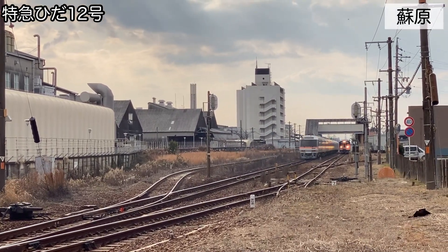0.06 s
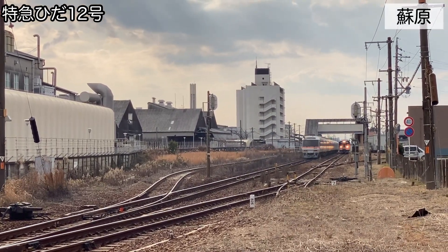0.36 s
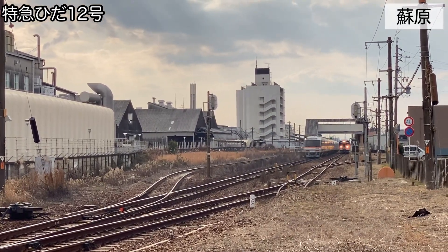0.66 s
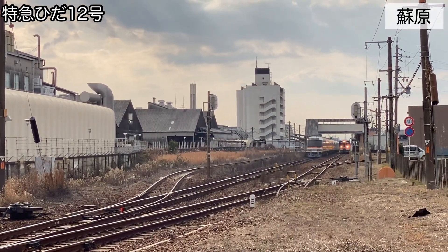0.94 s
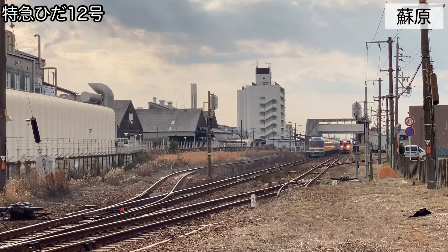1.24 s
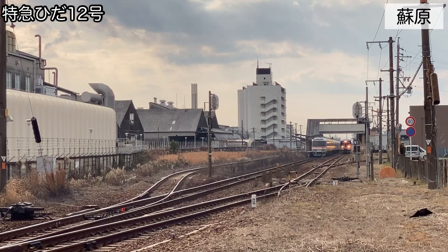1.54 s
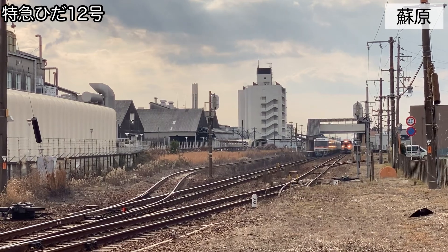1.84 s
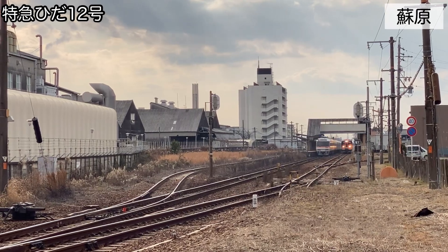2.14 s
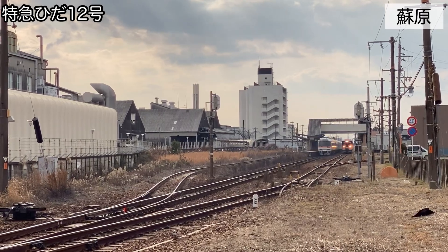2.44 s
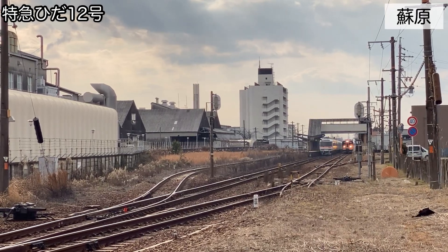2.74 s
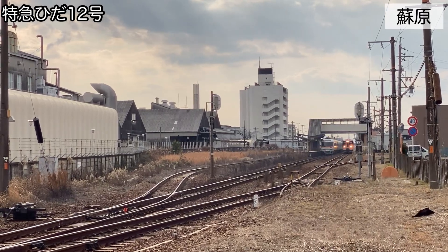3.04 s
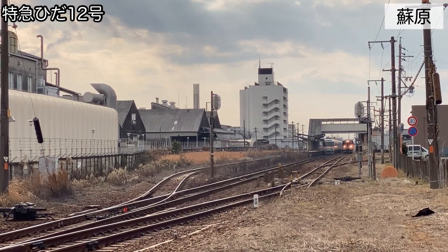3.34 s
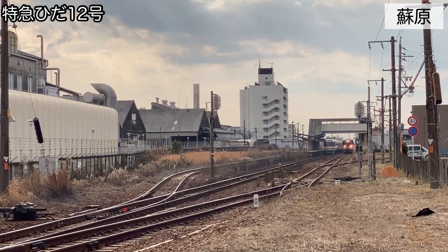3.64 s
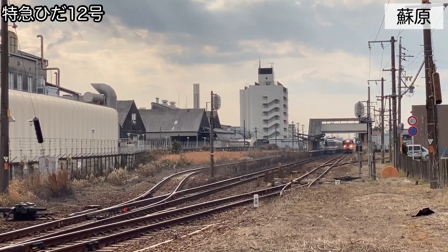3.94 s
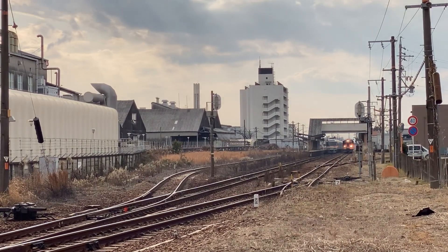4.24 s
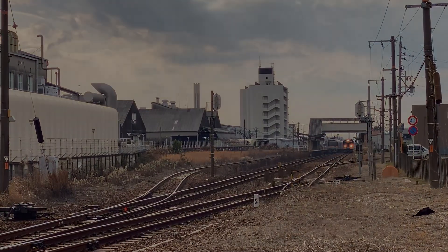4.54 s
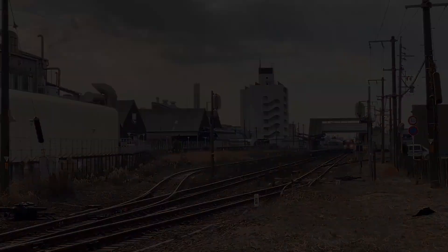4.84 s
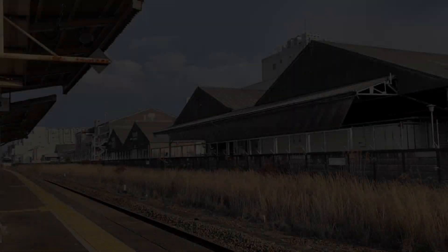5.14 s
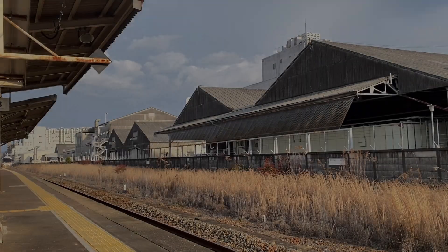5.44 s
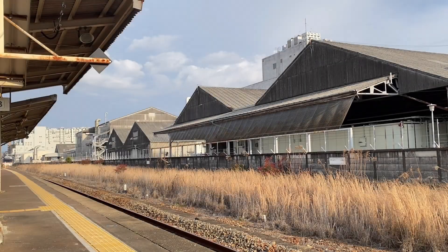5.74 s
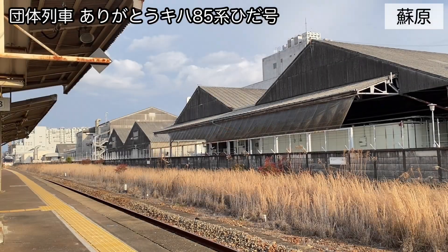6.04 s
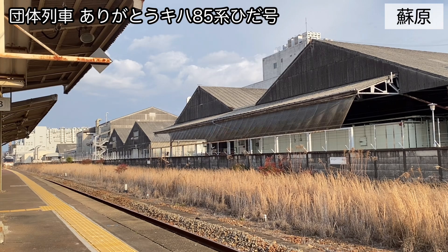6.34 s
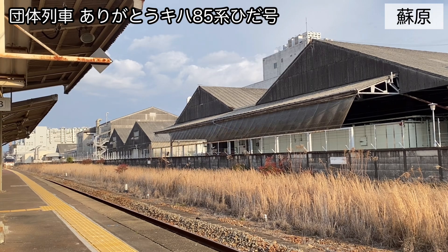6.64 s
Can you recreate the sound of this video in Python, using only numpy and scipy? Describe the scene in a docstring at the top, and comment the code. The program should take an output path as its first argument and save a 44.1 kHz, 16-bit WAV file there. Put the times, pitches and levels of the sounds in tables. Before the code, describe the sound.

From the start, a diesel train is heard drawing away at a distance from beside the track. Its wheels make a steady rolling roar with a wavering howl and a light hiss that eases over the first second or two. The low engine hum surges and fades unevenly, strongest around 2 seconds. Wind buffets the microphone, with low thumps from about 2.2 to 2.5 seconds and repeatedly from 3.5 to 5. Blurred clatter over rail joints comes between 3.2 and 4.4 seconds as the rumble builds. At 5 seconds the sound cuts abruptly to a much quieter platform, with town murmur, a faint electrical factory hum and softly rustling reeds. A strong gust thumps the microphone from 6.3 to 6.5 seconds, the loudest moment. A small dry click follows, then three faint, thin, sharp ticks before the end near 7 seconds.

```python
"""Beside the track at a station, a diesel railcar draws away: its exhaust hums at a 75 Hz firing rate
under the distant roar, howl and clatter of its wheels, while wind buffets and thumps the microphone.
At five seconds the scene cuts to a quiet platform beside a factory: town murmur, faint mains hum,
one strong gust, rustling reeds, a dry click and a few thin, sharp ticks."""
import sys
import numpy as np
from scipy import signal
from scipy.fft import rfft, irfft, next_fast_len
from scipy.io import wavfile
from scipy.ndimage import uniform_filter1d

SR = 44100
rng = np.random.default_rng(int(sys.argv[2]) if len(sys.argv) > 2 else 0)


def transcribe(signal):
    """Save signal, clipped to [-1, 1], as a 16-bit WAV file at the path in sys.argv[1]."""
    frames = np.atleast_2d(signal).T
    limited = np.clip(frames, -1, 1)
    pcm = np.round(limited * 32767).astype(np.int16)
    wavfile.write(sys.argv[1], SR, pcm)


N = 303842
TIME = np.arange(N) / SR
CUT_S = 5.0205   # hard cut from trackside to platform
TRACKSIDE = 1.0 * (TIME < CUT_S)
PLATFORM = 1 - TRACKSIDE

# The engine's note. Each row: multiple of the firing rate, relative level in dB.
ENGINE_ORDERS = [(1, -3.5), (1.5, -26), (2, -28), (2.667, -29.5), (3, -32.5)]
# The hum surges and fades through moving air. Each row: time in seconds, level in dB.
EXHAUST_FADER = [(0, -39), (.08, -40), (.17, -37.5), (.26, -41.5), (.4, -37.5), (.49, -54), (.57, -37.5),
                 (.68, -46.5), (.76, -36.5), (.85, -46.5), (.98, -35), (1.14, -34.5), (1.2, -57),
                 (1.27, -38), (1.33, -38), (1.41, -50.5), (1.55, -44), (1.7, -42), (1.83, -42.5),
                 (1.92, -30), (1.99, -33), (2.08, -28), (2.18, -41.5), (2.31, -26.5), (2.39, -43.5),
                 (2.6, -41), (2.72, -50), (2.79, -33.5), (2.9, -42), (3.0, -39), (3.09, -37.5),
                 (3.15, -43.5), (3.33, -30.5), (3.45, -43), (4.2, -48), (4.5, -42), (4.7, -47), (4.78, -31),
                 (4.87, -45), (4.95, -33.5), (5.02, -38)]


def exhaust(firing_hz=75.1, drone_hz=142, drone_width_hz=85):
    """Only the lowest engine orders carry this far; the upper ones waver and blur into a drone."""
    level_db, = in_time(EXHAUST_FADER)
    unsteady_hz = firing_hz * (1 + 0.005 * drift(1.7) + 0.012 * drift(11.8))
    phase = 2 * np.pi * np.cumsum(unsteady_hz) / SR
    orders = sum(from_db(db) * np.sin(k * phase) * waver(3 * (k > 1), 11) for k, db in ENGINE_ORDERS)
    drone = from_db(-53.5) * noise(resonance(drone_hz, drone_width_hz, order=2), TRAIN_LIKENESS)
    return np.sqrt(2) * from_db(level_db) * orders * panned(-1.3) + drone


# Tone of the wheels' body, low end and top, and of the grass. Each row: frequency in Hz, gain in dB.
ROLLING_EQ = [(150, -28.5), (300, -16), (520, -8), (680, 2), (950, 0), (1120, 0), (1450, 0), (1680, -2.5),
              (1950, -3), (2300, -11), (2560, -9.5), (2880, -20), (3300, -21.5), (4500, -42)]
RUMBLE_EQ = [(100, -18), (200, -6.5), (280, 4), (480, 3.5), (620, 3), (800, -10), (1200, -18.5),
             (2500, -59.5)]
HISS_EQ = [(2400, -15.5), (3000, 1), (3400, 2.5), (4050, 0), (4750, -8), (5300, -10.5), (6000, -18.5),
           (7000, -25), (8500, -32.5), (11500, -41)]
GRASS_EQ = [(3000, -16), (5300, -0.5), (6300, 1.5), (7100, 1.5), (7900, 0), (8400, -7.5), (9300, -10),
            (10500, -13.5), (12000, -17), (15500, -27)]
# The rolling holds steady; the rumble builds and drops away. Each row: time in seconds, level in dB.
ROLLING_FADER = [(0, -45), (1.6, -46.5), (2.2, -45), (3.6, -45), (4.5, -45.5), (5.02, -46)]
RUMBLE_FADER = [(0, -53), (1.6, -52.5), (2.2, -51.5), (2.9, -52.5), (3.5, -49), (4.0, -47.5), (4.25, -45.5),
                (4.5, -43), (4.76, -50.5), (5.02, -49.5)]
# Wheels clatter over joints, blurred by distance. Each row: time in seconds, rumble boost in dB.
RAIL_JOINTS = [(3.26, 8), (3.42, 5.5), (3.59, 6), (3.86, 5.5), (3.99, 4.5), (4.12, 1), (4.36, 2)]


def roar(clatter_half_s=0.013, hiss_settle_s=1.1):
    """Wheels and running gear roll, howl, rumble and hiss; dry grass rustles nearby."""
    rolling_db, = in_time(ROLLING_FADER)
    rumble_db, = in_time(RUMBLE_FADER)
    clatter_db = sum(db * swell(s, clatter_half_s) for s, db in RAIL_JOINTS)
    hiss_db = -67 + 4.5 * np.exp(-(TIME / hiss_settle_s) ** 2)   # settles as the train draws off
    grass_db = -88.5 + 2 * TIME   # stirs more as the breeze freshens
    rolling = from_db(-0.86) * noise(eq(ROLLING_EQ), TRAIN_LIKENESS) * waver(0.65, 22)
    rumble = from_db(rumble_db + clatter_db) * noise(eq(RUMBLE_EQ), TRAIN_LIKENESS) * waver(1, 40)
    hiss = from_db(hiss_db) * noise(eq(HISS_EQ), TRAIN_LIKENESS) * waver(0.79, 30)
    grass = from_db(grass_db) * noise(eq(GRASS_EQ), TRAIN_LIKENESS) * waver(1, 30)
    return from_db(rolling_db) * (rolling + howl()) + rumble + hiss + grass


# The howl's voices. Each row: centre in Hz, width in Hz, relative level in dB.
HOWL_BANDS = [(745, 63, -11), (824, 51, -9), (1279, 58, -10)]
# The howl bends and flares. Each row: time in seconds, pitch ratio, boost in dB.
HOWL_BENDS = [(0, 0.96, -3), (.45, 0.98, -1), (1.0, 1.036, -2), (1.75, 1, 0.5), (2.15, 0.99, 1.5),
              (2.45, 0.99, 1.5), (2.85, 1.01, 1), (3.3, .985, 2.5), (3.7, 1.01, 2.5), (4.3, 0.98, 2),
              (5.02, 1.05, 1)]


def howl(wander=0.014, wander_hz=1.6):
    """The wheels howl in narrow bands that bend together while each wavers on its own."""
    pitch_ratio, flare_db = in_time(HOWL_BENDS)
    out = 0
    for hz, width_hz, db in HOWL_BANDS:
        bent_time = np.cumsum(pitch_ratio * (1 + wander * drift(wander_hz))) / SR
        band = noise(resonance(hz, width_hz), TRAIN_LIKENESS)
        bent = np.array([np.interp(bent_time, TIME, side) for side in band])
        out = out + from_db(db + flare_db) * bent * waver(1.2, 4.3)
    return out


# The wind bed at the track. Each row: time in seconds, shared level in dB, opposed level in dB.
BREEZE = [(0, -41, -49), (1.1, -48, -58.5), (1.55, -45, -56.5), (2.1, -44.5, -40), (2.85, -42, -47),
          (3.4, -41, -37.5), (4.3, -44, -36.5), (4.7, -40, -38), (5.0, -38, -45)]
# Gusts. Each row: peak time and half length in seconds, shared and opposed levels in dB.
GUSTS = [(2.247, 0.11, -32.5, -56), (2.474, 0.028, -33, -40), (3.763, 0.17, -38, -50),
         (4.54, 0.075, -45, -37), (4.801, 0.024, -39, -50), (4.974, 0.026, -39, -34),
         (5.87, 0.052, -42, -51), (6.348, 0.047, -33, -55), (6.438, 0.043, -31.5, -39),
         (6.543, 0.022, -38.5, -42.5), (6.672, 0.033, -37.5, -59), (6.777, 0.017, -40, -52)]


def wind_strength(build_s=0.39):
    """Shared and opposed pressure on the microphone's two ports: gusts add power to the breeze."""
    sheltered = from_db([[-48], [-54]]) * np.clip((TIME - CUT_S) / build_s, 0.3, 1)
    breeze = TRACKSIDE * from_db(in_time(BREEZE)) + PLATFORM * sheltered
    power = breeze ** 2
    for s, half_s, shared_db, opposed_db in GUSTS:
        place = TRACKSIDE if s < CUT_S else PLATFORM
        power += place * (from_db([[shared_db], [opposed_db]]) * swell(s, half_s)) ** 2
    return np.sqrt(power)


# Tone of the shared buffeting and the opposed swirl. Each row: frequency in Hz, gain in dB.
BUFFET_EQ = [(15, -42), (26, -23.5), (38, -5), (51, 3), (75, 1.5), (105, -4), (160, -17.5), (220, -15),
             (320, -24.5), (500, -42.5), (1500, -48), (3000, -70.5)]
SWIRL_EQ = [(15, -44), (26, -26), (50, -2.5), (75, 2), (115, -8), (215, -13.5), (280, -29.5), (400, -37.5),
            (800, -48), (2000, -75)]


def wind():
    """Large eddies press on both ports together, small ones push them against each other."""
    press, swirl = wind_strength()
    shared = brightened(turbulence(BUFFET_EQ, steady_s=0.071), press)
    puffs = waver(3.5, 16)
    opposed = brightened(turbulence(SWIRL_EQ, steady_s=0.1), swirl)
    return from_db(-1.5) * (swept(shared * puffs) * panned(-2.2) + opposed * [[1], [-1]])


def turbulence(spectrum, steady_s):
    """Lumpy low noise, its power levelled over steady_s."""
    lumps = noise(eq(spectrum))
    power = uniform_filter1d(lumps ** 2, int(steady_s * SR))
    return lumps / np.sqrt(np.abs(power) + 1e-6)


def brightened(pressure, strength, crossover_hz=105, neutral_db=-36.5):
    """Stronger wind breaks into smaller eddies, so its top grows faster than its low end."""
    deep = signal.sosfiltfilt(signal.butter(3, crossover_hz, fs=SR, output="sos"), pressure)
    top_gain = (strength / from_db(neutral_db)) ** 0.25
    return strength * (deep + (pressure - deep) * top_gain)


def swept(pressure, lag_s=0.0006):
    """Wind meets both ports at once by the track; on the platform it reaches the right one first."""
    return right_first(pressure, lag_s * PLATFORM)


# Single wind thumps. Each row: start in seconds, level in dB, pitch in Hz, attack in seconds.
EDDIES = [(0.116, -33.5, 198, .007), (0.197, -35, 62.3, 0.0071), (1.42, -34.5, 134.8, 0.0056),
          (2.179, -29.5, 171, 0.0043), (2.228, -22.5, 113, 0.0049), (2.277, -28, 136, 0.0055),
          (2.449, -30.5, 168.5, 0.0065), (2.462, -28, 105, 0.0045), (2.479, -33.5, 68.5, .007),
          (3.498, -34, 66.6, .007), (3.709, -31, 52.4, .008), (3.809, -28.5, 125, 0.0045),
          (3.869, -27.5, 61, .007), (4.088, -30, 66, 0.0089), (4.168, -29.5, 64, 0.0092),
          (4.227, -30, 64, 0.01), (4.405, -32.5, 75, .007), (4.439, -31.5, 71, 0.011),
          (4.571, -29.5, 68.7, 0.011), (4.703, -23.5, 112, 0.0035), (4.852, -32, 206, 0.0034),
          (4.951, -26, 58, 0.0071), (6.331, -28.5, 70, 0.0056), (6.379, -22.5, 88, 0.0048),
          (6.414, -19, 131, 0.0031), (6.427, -21, 80.4, 0.0055), (6.455, -19, 113, 0.0031),
          (6.473, -17.5, 72, 0.0049), (6.518, -34, 55, 0.0073)]


def thumps(sag_octaves=0.071):
    """An eddy hits the ports: a pressure swing that swells, sinks in pitch as it spreads, and dies."""
    out = np.zeros(N)
    for s, db, hz, attack_s in EDDIES:
        span = slice(int(s * SR), int(s * SR) + SR // 10)
        age = np.maximum(TIME[span] - s, 0) / attack_s
        phase = 2 * np.pi * np.cumsum(hz * 2 ** (sag_octaves * (1 - age))) / SR
        out[span] += from_db(db) * np.sin(phase) * age * np.exp(1 - age)
    return swept(out) * panned(-1.1)


# Tone of the town's murmur, the far hiss and the reeds. Each row: frequency in Hz, gain in dB.
TOWN_EQ = [(60, -13.5), (150, 6), (300, -0.5), (480, -4), (650, -5.5), (1050, -8.5), (1280, -14),
           (1500, -10.5), (2000, -25), (3500, -50)]
FAR_HISS_EQ = [(900, -19.5), (1500, -9), (2000, 5), (2400, -2.5), (2750, -3), (3300, -13), (4200, -27.5),
               (5800, -26), (8500, -33), (12000, -34), (15500, -53.5)]
REEDS_EQ = [(1800, -21), (2800, 2.5), (3600, 3.5), (4400, -5.5), (5400, -12), (6100, -23), (8000, -34),
            (12000, -36)]
# The reeds stir and settle. Each row: peak time in seconds, half length in seconds, level in dB.
REED_STIRS = [(5.2, 0.23, -76), (6.37, .055, -79), (6.748, 0.17, -79.5)]


def platform_air(reeds_rest_db=-94.5):
    """Each stir of air rustles the reeds and lifts the town's murmur and the far hiss a little."""
    rustle = from_db(reeds_rest_db) + sum(from_db(db) * swell(s, half_s) for s, half_s, db in REED_STIRS)
    stir = rustle / from_db(reeds_rest_db)
    town = from_db(-55) * stir ** 0.083 * noise(eq(TOWN_EQ), PLATFORM_LIKENESS) * waver(0.23, 3.7)
    hiss = from_db(-72.5) * stir ** 0.19 * noise(eq(FAR_HISS_EQ), PLATFORM_LIKENESS) * waver(1, 13)
    reeds = rustle * noise(eq(REEDS_EQ), PLATFORM_LIKENESS) * waver(0.8, 25)
    return town + hiss + reeds


# The factory's hum. Each row: frequency in Hz, level in dB.
MAINS_PARTIALS = [(120.3, -65.5), (241.6, -67), (360.7, -66), (481, -71.5), (721.4, -80.5)]


def mains_hum():
    """The factory hums on mains harmonics, each drifting in phase and level."""
    hum = sum(from_db(db) * np.sin(2 * np.pi * hz * TIME + 0.85 * drift(3.3)) * waver(2.4, 7.1)
              for hz, db in MAINS_PARTIALS)
    return np.sqrt(2) * hum * panned(-2.1)


# Thin ticks off to the right. Each row: time in seconds, level in dB, low cut and high cut in Hz.
TICKS = [(5.331, -59, 5500, 8500), (6.604, -51.5, 5200, 19000), (6.715, -50, 4800, 19000),
         (6.8313, -50, 4770, 19000)]
# Their glassy tone. Each row: frequency in Hz, gain in dB.
TICK_EQ = [(2000, -3), (5500, 3.5), (6800, 6), (8500, 5), (10800, -1), (13000, -7), (15300, 7),
           (16500, -11)]


def ticks(rise_s=0.00092, fall_s=0.002, echo_db=-21, echo_t60_s=0.17):
    """Each tick is a brief bright snap with a faint tail under the platform roof."""
    snap = noise(eq(TICK_EQ))
    echo = np.array([noise(eq(TICK_EQ)), noise(eq(TICK_EQ))])
    out = np.zeros((2, N))
    for s, db, low_hz, high_hz in TICKS:
        age = TIME - s
        decay = np.abs(age) / np.where(age < 0, rise_s, fall_s)
        burst = snap * np.exp(-np.minimum(decay, 20))
        direct = right_first(burst, lag_s=0.000187) * panned(-1.8)
        tail = echo * (age > 0) * from_db(echo_db - 60 * np.clip(age / echo_t60_s, 0, 2))
        band = signal.butter(3, [low_hz, high_hz], "band", fs=SR, output="sos")
        out += from_db(db - 7.5) * signal.sosfilt(band, direct + tail)
    return out


# The click's ring. Each row: frequency in Hz, relative level in dB, seconds to fall by 60 dB.
CLICK_MODES = [(3117, -2, .011), (3391, 0, .008), (5130, -11, .01), (6700, -15, .008)]


def click(start_s=6.5315, attack_s=0.0006):
    """A small dry thing cracks once and rings briefly."""
    age = np.maximum(TIME - start_s, 0)
    ring = sum(from_db(db - 60 * np.minimum(age / t60, 3)) * np.sin(2 * np.pi * hz * age)
               for hz, db, t60 in CLICK_MODES)
    return from_db(-57.5) * (1 - np.exp(-age / attack_s)) * ring


def stalks(rasp_hz=3500, rush_hz=520):
    """A gust rushes softly through the reeds, and dry stalks rub in a narrow, flickering rasp."""
    rasp = from_db(-55) * noise(resonance(rasp_hz, width_hz=330), PLATFORM_LIKENESS) * waver(2.5, 30)
    rush = from_db(-24) * noise(resonance(rush_hz, width_hz=600, order=2), PLATFORM_LIKENESS)
    press, _ = wind_strength()
    return press * (rasp + rush)


# The sizzle's tone. Each row: frequency in Hz, gain in dB.
SIZZLE_EQ = [(2800, -14), (3700, 0), (4500, 1), (5400, -7), (6100, -18), (8000, -33)]


def sizzle(fade_db_per_s=23):
    """A smooth, bright hiss in the distance dies away as the platform opens."""
    level_db = -75 - fade_db_per_s * np.maximum(TIME - CUT_S, 0)
    return from_db(level_db) * noise(eq(SIZZLE_EQ), PLATFORM_LIKENESS)


# Stereo width of each place. Each row: frequency in Hz, left-right likeness (1 is mono).
TRAIN_LIKENESS = [(100, 0.92), (300, 0.79), (550, 0.76), (950, 0.75), (1700, 1), (3000, 0.88), (8000, 0.69)]
PLATFORM_LIKENESS = [(100, 0.8), (300, 0.93), (550, 0.64), (950, 0.35), (2000, 0.7), (8000, 0.35)]
# Balance of the noise beds. Each row: frequency in Hz, left minus right in dB.
BALANCE = [(100, -5.5), (330, -0.5), (510, -3.5), (800, -1.1), (1250, -1.6), (2000, 0), (8000, 0.5)]


def noise(gain_at, likeness=None):
    """Noise of unit rms with a given gain per Hz; stereo if a likeness table is given."""
    size = next_fast_len(N)
    hz = np.arange(size // 2 + 1) * SR / size
    mid, side = rfft(rng.standard_normal((2, size))) * gain_at(hz)
    if likeness is None:
        return rms_one(irfft(mid, size)[:N])
    alike = np.clip(at_hz(likeness, hz), 0, 0.995)
    pair = np.sqrt(1 + alike) * mid + np.sqrt(1 - alike) * side * [[1], [-1]]
    return rms_one(irfft(pair * panned(at_hz(BALANCE, hz)), size)[:, :N])


def eq(spectrum):
    """Gain per Hz from a tone table, rolling off beyond its last point."""
    return lambda hz: from_db(at_hz(spectrum, hz)) / np.maximum(hz / spectrum[-1][0], 1) ** 4


def resonance(centre_hz, width_hz, order=1):
    """Gain per Hz of a resonant peak; a higher order steepens the skirts."""
    return lambda hz: 1 / (1 + ((hz - centre_hz) / width_hz) ** 2) ** order


def drift(rate_hz):
    """Smooth random motion of unit rms, drawn every 40 samples."""
    pole = np.exp(-80 * np.pi * rate_hz / SR)
    steps = rng.standard_normal(N // 40 + 2002)
    slow = signal.lfilter([1], [1, -2 * pole, pole * pole], steps)[2000:]
    return np.interp(np.arange(N) / 40, np.arange(len(slow)), rms_one(slow))


def waver(depth_db, rate_hz):
    """Randomly wavering gain, as of a sound carried through moving air."""
    return from_db(depth_db * drift(rate_hz))


def swell(at_s, half_s):
    """Bell-shaped envelope that peaks at 1."""
    return np.exp(-0.5 * ((TIME - at_s) / half_s) ** 2)


def in_time(rows):
    """Each column of an automation table at every sample."""
    s, *columns = np.transpose(rows)
    return [np.interp(TIME, s, column) for column in columns]


def at_hz(points, hz):
    """Read a table on a log-frequency axis."""
    table_hz, value = np.transpose(points)
    return np.interp(np.log(np.maximum(hz, 1)), np.log(table_hz), value)


def right_first(x, lag_s):
    """Stereo pair with the left side delayed."""
    return np.array([np.interp(TIME - lag_s, TIME, x), x])


def panned(left_over_right_db):
    """Left and right gains for a level difference."""
    return from_db(np.array([[0.5], [-0.5]]) * left_over_right_db)


def from_db(db):
    """Decibels to gain."""
    return 10 ** (np.asarray(db) / 20)


def rms_one(x):
    """Scale to unit rms."""
    return x / np.sqrt(np.mean(x ** 2) + 1e-20)


def scene():
    """First the trackside, then the platform; wind blows in both."""
    on_platform = platform_air() + mains_hum() + sizzle() + stalks() + ticks() + click()
    return TRACKSIDE * (exhaust() + roar()) + PLATFORM * on_platform + wind() + thumps()


def record(dry, low_cut_hz=24, high_cut_hz=15800, gap_s=0.0113):
    """The microphone sheds the deepest wind; a short silence parts the places; the top is cut steeply."""
    low_cut = signal.butter(3, low_cut_hz, "high", fs=SR, output="sos")
    high_cut = signal.ellip(10, 0.1, 80, high_cut_hz, fs=SR, output="sos")
    gate = np.clip(np.maximum(CUT_S - TIME, TIME - CUT_S - gap_s) / 0.0003, 0, 1)
    return signal.sosfilt(high_cut, signal.sosfilt(low_cut, dry) * gate)


dry = scene()
out = record(dry)
transcribe(out)
```